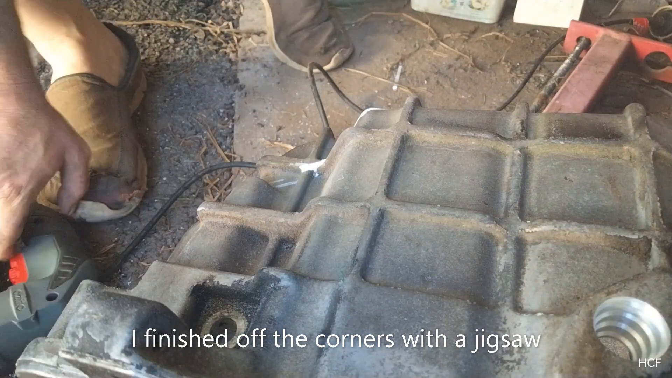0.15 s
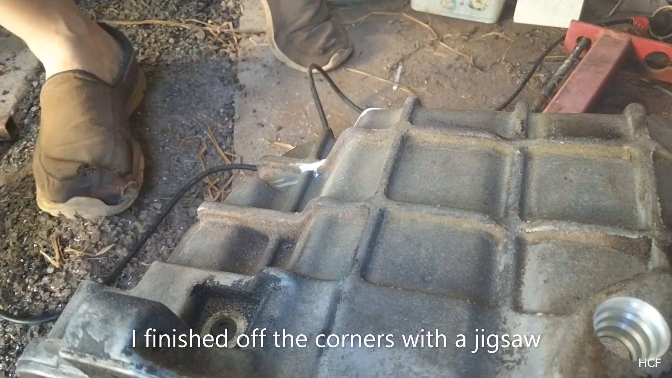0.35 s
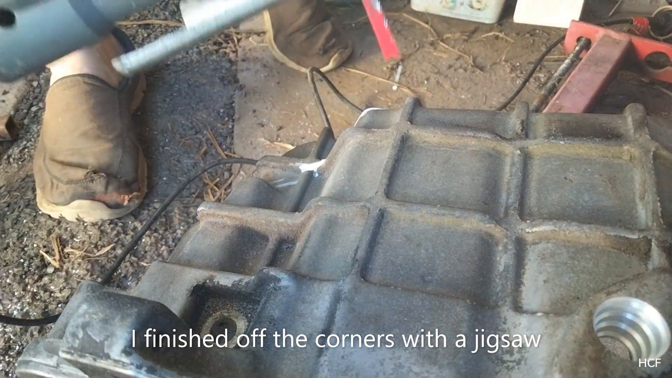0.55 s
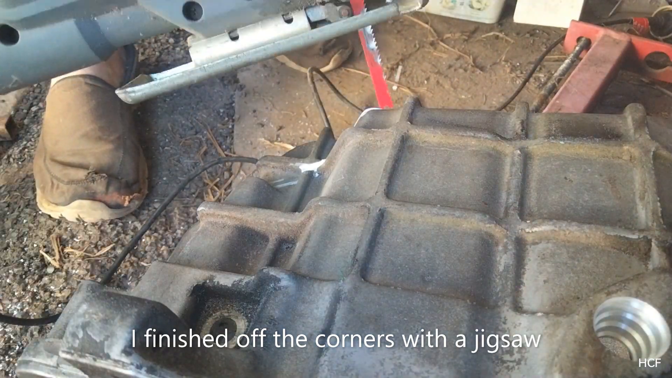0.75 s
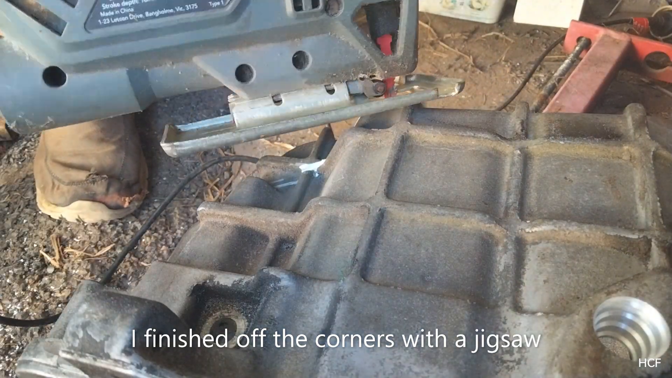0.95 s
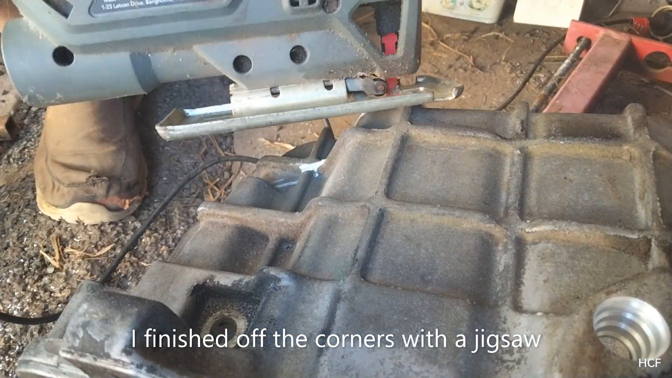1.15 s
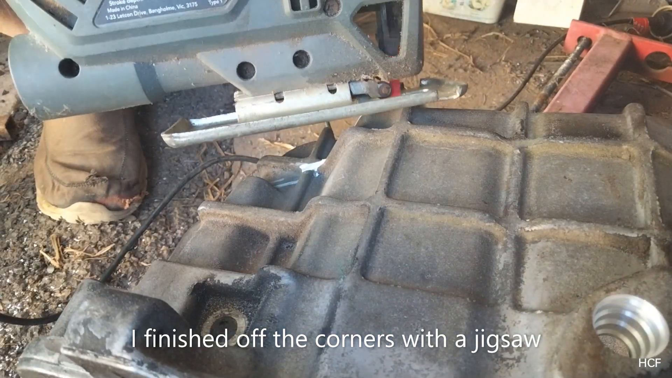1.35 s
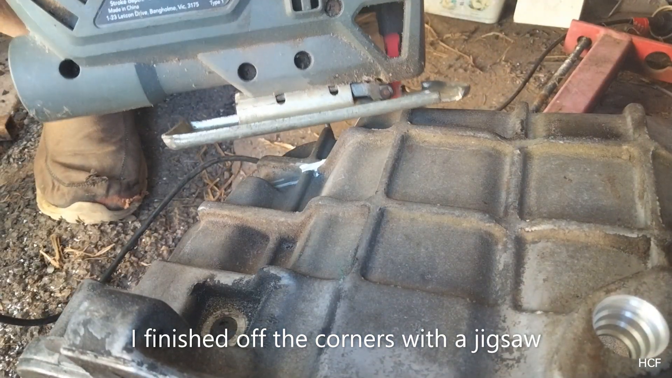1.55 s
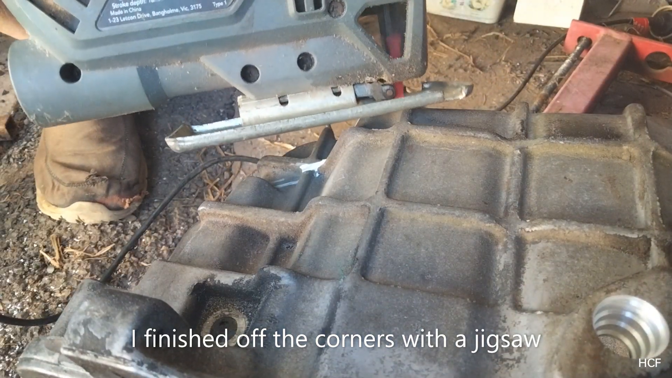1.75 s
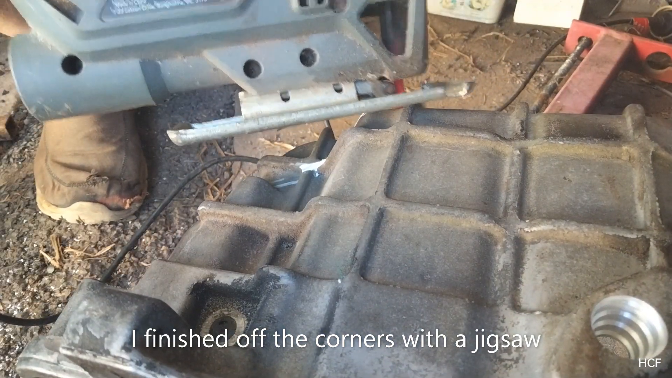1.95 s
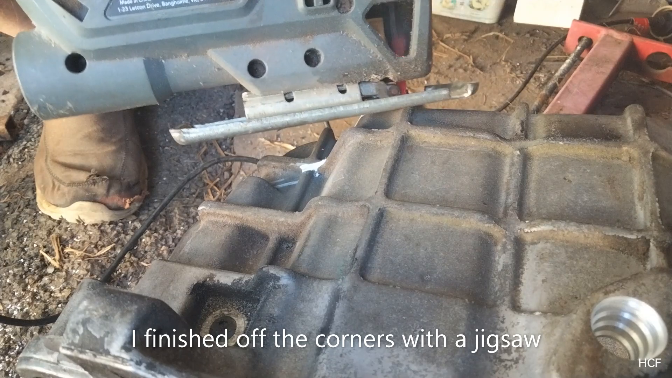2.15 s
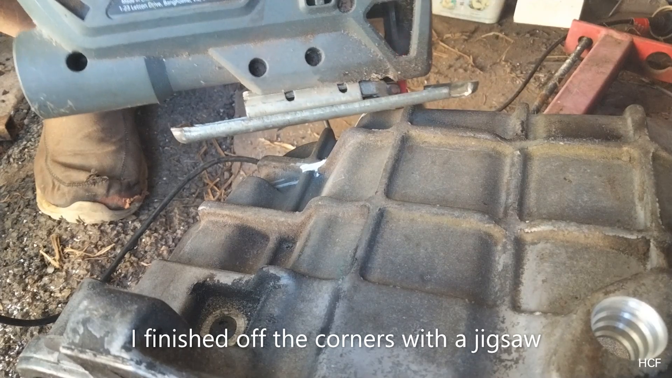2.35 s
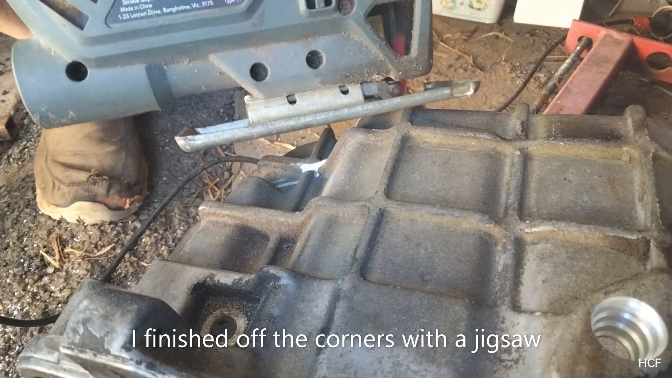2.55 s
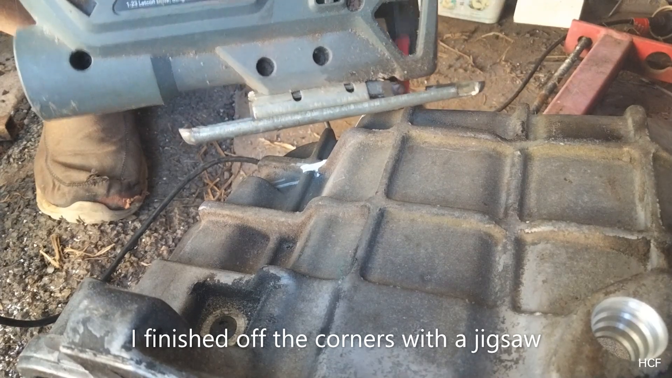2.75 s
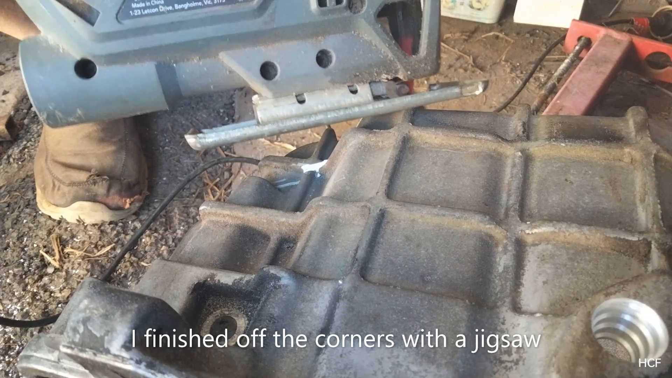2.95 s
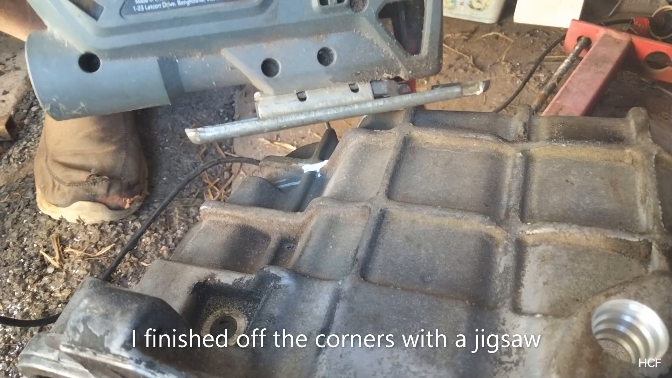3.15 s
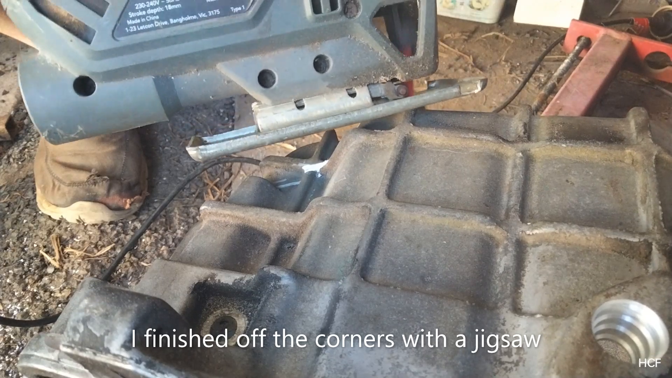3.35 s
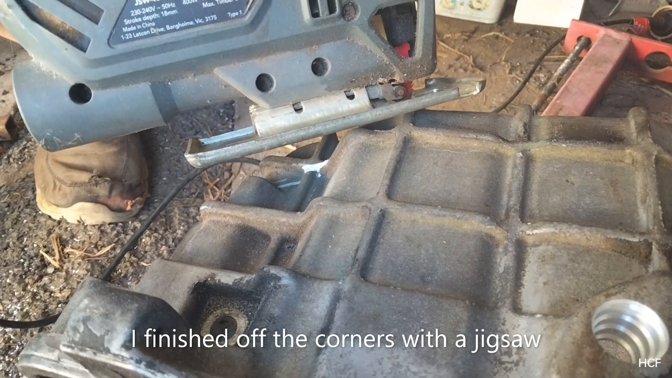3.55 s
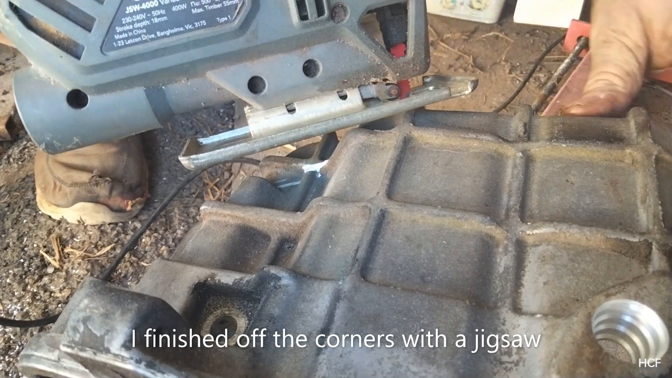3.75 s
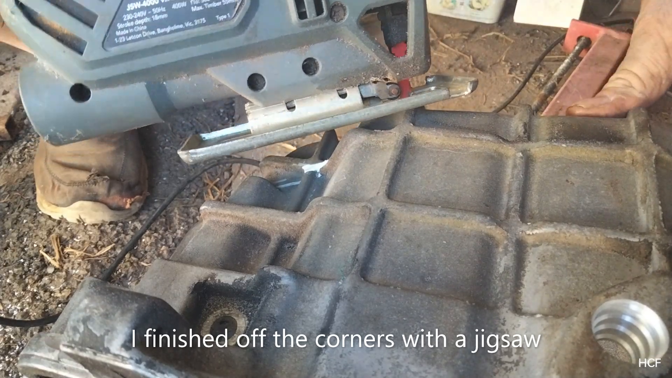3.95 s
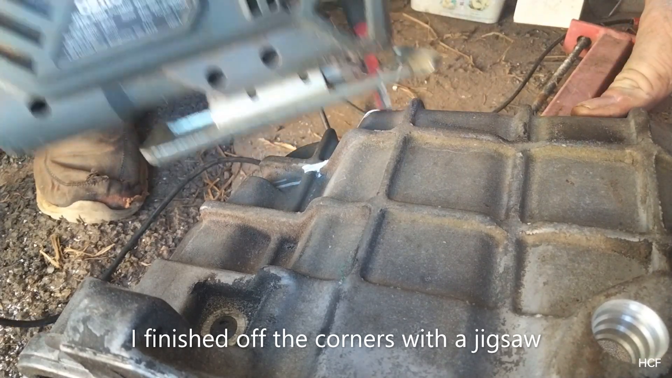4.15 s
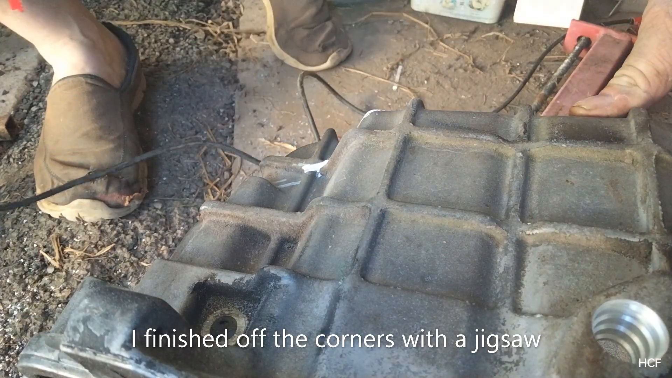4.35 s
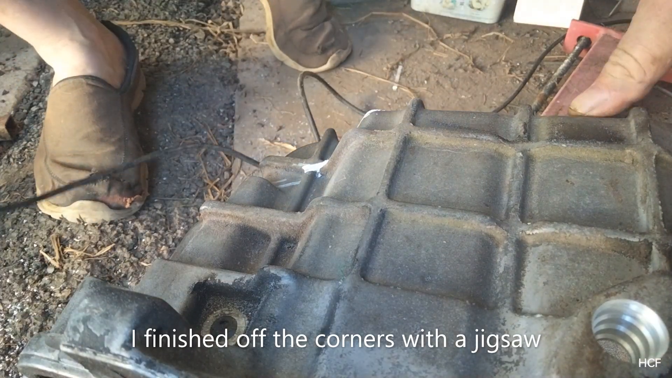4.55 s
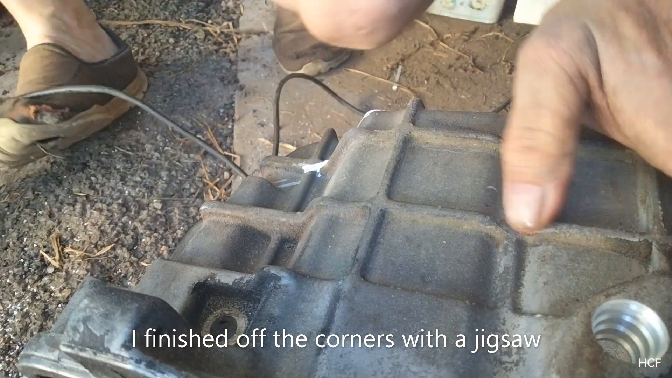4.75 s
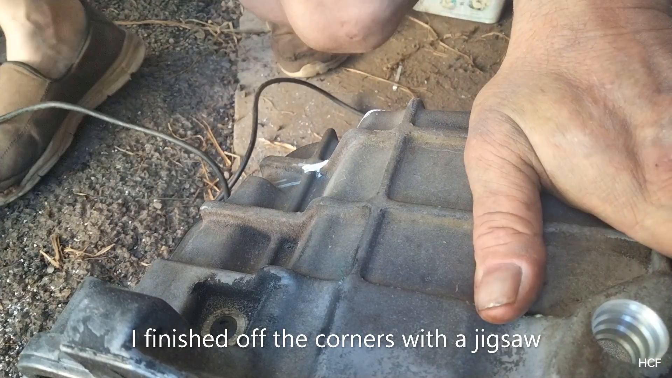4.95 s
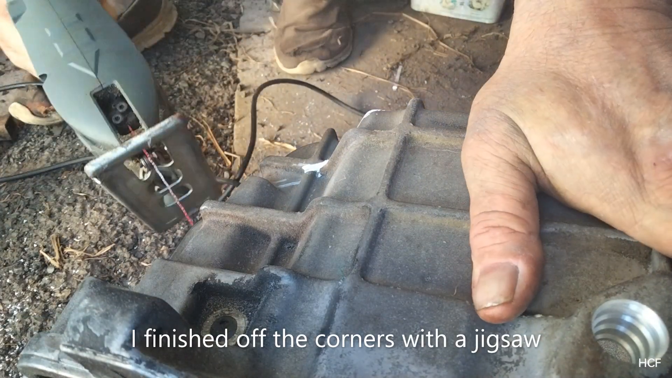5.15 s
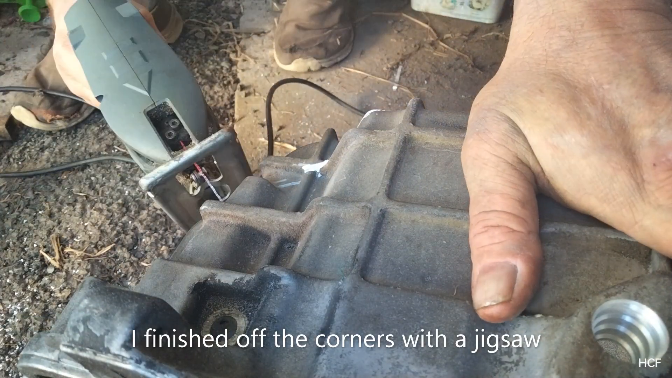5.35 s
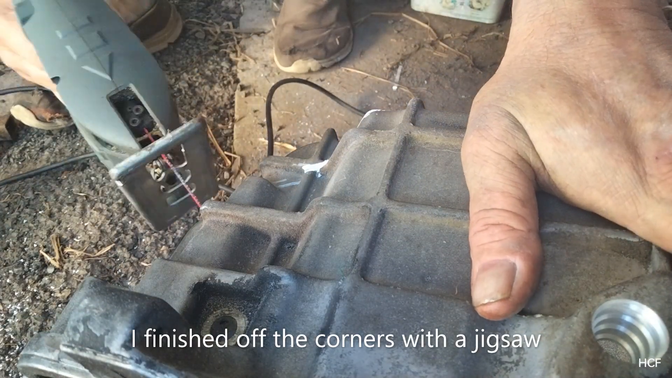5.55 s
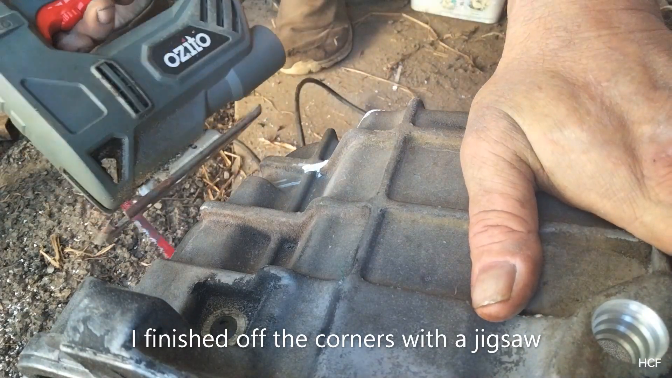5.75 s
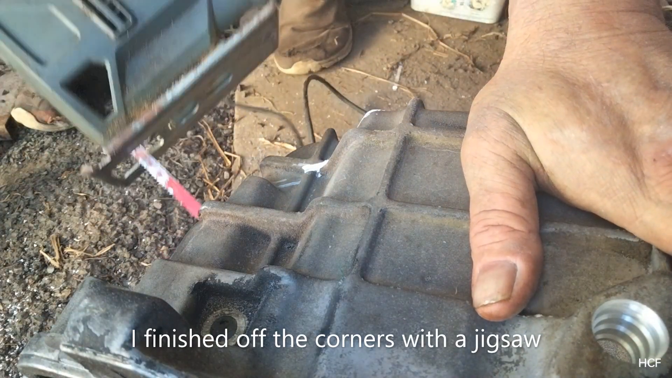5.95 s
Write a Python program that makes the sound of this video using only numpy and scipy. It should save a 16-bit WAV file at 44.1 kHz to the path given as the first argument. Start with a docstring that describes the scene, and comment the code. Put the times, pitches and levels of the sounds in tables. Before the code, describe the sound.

Quiet shuffling on grit and small dry ticks, then a thin blade tapping an edge and a steel shoe clacking onto a casting. One loud jigsaw cut dominates the middle: coarse, rattling, uneven in speed, with motor whine and a late screech. It kicks free and stops; the saw clanks on metal, then sparse clicks and scuffs remain. Close, dry microphone, faint wavering hum.

```python
"""Close two-port microphone over a gritty floor: still air, an uneven distant rumble, a hum that comes and goes.
Shoes, clothes and cable scuff the grit (filtered noise) and small clicks fall; the blade taps along the edge, then
the jigsaw's steel shoe clacks onto a cast aluminium housing (noise bursts ringing in modes of the metal).
From 1.3 to 3.5 s it cuts at a changing speed: rasp, rattle, gear and whine follow one stroke angle, with squeals.
Coasting, it leaves the slot; a clank on the casting near 4.2 s, clicks and scuffs follow."""
import sys
import numpy as np
from scipy import signal
from scipy.fft import rfft, irfft
from scipy.io import wavfile
from scipy.ndimage import uniform_filter1d

SR = 44100
rng = np.random.default_rng(int(sys.argv[2]) if len(sys.argv) > 2 else 0)


def digitize_waveform(pressure):
    """Quantize a signal to 16-bit integers and store it at the path in sys.argv[1].

    Rows of a 2-D input are taken as channels; values are limited to [-1, 1].
    """
    field = np.atleast_2d(pressure).T
    bounded = np.clip(field, -1, 1)
    quanta = np.round(bounded * 32767).astype(np.int16)
    wavfile.write(sys.argv[1], SR, quanta)


N = 268125
T, HZ = np.arange(N) / SR, np.fft.rfftfreq(N, 1 / SR)
OFF_S, OUT_S = 3.29, 3.485  # the trigger is let go, the blade leaves the slot
FAST_HZ = 127  # blade strokes a second at which the cut runs steadily


def amp(db):
    """Decibels to gain."""
    return np.exp(np.asarray(db) * (np.log(10) / 20))


def unit(x):
    """Scales to rms 1."""
    return x / np.sqrt(np.mean(x ** 2) + 1e-20)


def read(points, hz=HZ):
    """Reads a spectrum table along a log-frequency axis."""
    f, value = np.transpose(points)
    return np.interp(np.log(hz + 1), np.log(f + 1), value)


def since(s):
    """Seconds gone by after a moment, zero before it."""
    return np.maximum(T - s, 0)


def swell(start, end, edge=.25):
    """Rises, holds and falls between two moments; each edge takes a share of the length."""
    u = (T - start) / (end - start)
    return np.sin(np.pi / 2 * np.clip(np.minimum(u, 1 - u) / edge, 0, 1)) ** 2


def panned(db):
    """Gains of the two channels for a left-minus-right level."""
    return amp(np.array([[db], [-db]]) / 2)


def wander(hz):
    """Slow random drift of rms 1, with little movement faster than the given rate."""
    real, imag = rng.standard_normal((2, len(HZ) // 4))
    return unit(irfft((real + 1j * imag) / (1 + (HZ[:len(real)] / hz) ** 4), N))


def colour(x, gain):
    """Filters by a gain for every frequency, to rms 1."""
    return unit(irfft(rfft(x) * gain, N))


def humps(modes):
    """Gain of a set of resonances (f/Hz, width/Hz, level/dB), rms 1."""
    return unit(np.sqrt(sum(amp(db) ** 2 / (1 + (2 * (HZ - hz) / width) ** 2) ** 2 for hz, width, db in modes)))


def ports(pair, likeness=1.):
    """Two unrelated signals become what the left and right microphone ports pick up."""
    # what the ports share: (f/Hz, likeness before scaling)
    port_likeness = [(60, 0.78), (130, 1), (290, 0.84), (640, 1), (1410, 0.95), (3100, 0.7), (6820, 0.024),
                     (15000, 0.44)]
    # phase between the ports: (f/Hz, left leads by/rad)
    port_lead = [(0, -3), (1890, 0.33), (3270, 1.72), (4820, 1.5), (5080, 3), (6630, -2), (8180, 6),
                 (8700, 11.5), (9650, 9.5), (12000, -0.5), (12900, 10.5), (15100, -3), (15800, -10.5),
                 (16600, 45)]
    # balance of the ports: (f/Hz, left minus right level/dB)
    port_tilt = [(60, -6.5), (110, -1.5), (200, -0.5), (380, 0), (700, -0.5), (1290, -0.5), (2380, 0.0),
                 (4400, -0.5), (8120, -1.5), (15000, 0)]
    a, b = rfft(pair)
    same = np.clip(read(port_likeness) * likeness, 0, 1)
    side = amp(read(port_tilt) / 2) * np.exp(.5j * read(port_lead))
    left = a * side
    right = (same * a + np.sqrt(1 - same ** 2) * b) / side
    return irfft(np.array([left, right]), N)


def hiss(likeness=0.42):
    """White noise at both ports."""
    return ports(rng.standard_normal((2, N)), likeness)


def tearing(x, patchy_db, rate_hz):
    """Uneven grains or chips: each band of the sound flares and fades by itself."""
    z = signal.stft(x, nperseg=256, noverlap=192)[2]
    field = uniform_filter1d(rng.standard_normal(z.shape[1:]), size=5, axis=0)
    field = uniform_filter1d(field, size=max(1, round(SR / rate_hz / 64)), axis=1)
    return signal.istft(z * amp(patchy_db * unit(field)), nperseg=256, noverlap=192)[1][:, :N]


def background():
    """Still air and an uneven distant rumble are filtered noise; the faint hum is a wavering sine."""
    # colour of the still air: (f/Hz, relative level/dB per Hz)
    air_colour = [(18, -68.5), (30, -24.5), (138, -7), (245, 6.5), (295, -5.5), (526, 0), (1130, -7.5),
                  (1960, -8.5), (3220, -9.5), (4080, -6), (4420, -9.5), (9460, -19), (11700, -24),
                  (13000, -22), (16000, -26)]
    # the hum comes and goes: (start t/s, end t/s, level/dB)
    hum_swells = [(.1, .75, -59.5), (.6, 1.28, -53.5), (3.48, 4.28, -52)]
    air = amp(-50.5) * colour(hiss(0.71), amp(read(air_colour)))
    low_cut = HZ ** 2 / (HZ ** 2 + 150 ** 2)
    rumble = colour(hiss(1.0), humps([(360, 380, 0)]) * low_cut)
    low = amp(-56.0 + 3.1 * wander(6.1)) * rumble
    hum = unit(np.sin(2 * np.pi * np.cumsum(263 + 1.95 * wander(5.3)) / SR))
    presence = sum(amp(db) * swell(start, end) for start, end, db in hum_swells)
    return air + low + presence * amp(1.0 * wander(8.7)) * hum


def scuffs():
    """Shoes, clothes and cable drag softly over grit: grainy noise, part gritty and part dull rubbing."""
    # colour of grit underfoot: (f/Hz, relative level/dB per Hz)
    grit_colour = [(300, -30), (600, -12), (1100, -8), (1900, -3.5), (4400, -8.5), (9000, -10),
                   (12000, -13), (16000, -16.5)]
    # resonances of dull rubbing: (f/Hz, width/Hz, relative level/dB)
    rub_modes = [(600, 140, 0), (992, 350, -10)]
    # single drags: (start t/s, end t/s, level/dB, share of dull rubbing 0-1)
    drags = [(.073, 0.302, -43.5, 0.02), (0.32, .447, -49.5, 0), (0.63, 0.707, -46.5, 0.2),
             (0.938, 1.206, -43.5, .01), (3.626, 4.265, -51, 0.45), (4.555, 4.854, -47.5, 0.14),
             (4.802, 5.068, -42, 0.03), (5.075, 5.143, -42, 0), (5.12, 5.295, -52, 0),
             (5.38, 5.668, -43.5, 0.33), (5.752, 5.94, -45, 0)]
    grains = hiss(0.75) * amp(2.0 * wander(820) + 1.1 * wander(54))
    grains = tearing(grains, patchy_db=3.5, rate_hz=30)
    gritty = colour(grains, amp(read(grit_colour)))
    dull = colour(grains, humps(rub_modes))
    out = np.zeros((2, N))
    for start, end, db, share in drags:
        at = np.arange(round(start * SR), round(end * SR))
        stroke = amp(db) * signal.windows.tukey(len(at), .5)
        out[:, at] += stroke * (np.sqrt(1 - share) * gritty[:, at] + np.sqrt(share) * dull[:, at])
    return out


def clicks(level_db=1.2, ring_width_hz=350, click_t60=0.044, kick_t60=.04, rise_s=0.00081):
    """Tool, grit and the blade kicking in its slot: each click is a dry crack with one short ring."""
    # tool and grit: (t/s, level/dB before level_db, ring f/Hz, ring share 0-1, left minus right level/dB)
    small_clicks = [(.2325, -33, 8290, .05, 1), (0.318, -33.5, 7970, 0, 3), (.3614, -37, 2420, .5, .5),
                    (.402, -29.5, 9800, 0.24, 1), (0.412, -31, 9600, 0.4, 0),
                    (0.425, -27.5, 5770, 0.08, 1.5), (.493, -42, 1840, 0.05, 3), (.6494, -36, 2160, .4, -2),
                    (3.5034, -24, 6260, 0.2, 0), (3.704, -36.5, 11900, 0.64, -4),
                    (3.747, -37, 1780, .24, 0), (3.9188, -21, 4100, 0.72, -1.5), (4.0465, -41, 1700, 0, 0),
                    (4.7443, -20, 5360, .14, 1), (5.0774, -37.5, 3950, .6, 4),
                    (5.1141, -34, 3300, 0.56, 1.5)]
    # the blade kicks in the slot: (t/s, level/dB before level_db, ring f/Hz, ring share 0-1)
    slot_kicks = [(1.272, -21, 6370, 0.1), (2.039, -15, 1860, .7), (2.04, -18.5, 4250, 1),
                  (3.304, -12, 1410, 0.27), (3.468, -18, 1750, 0), (3.478, -12.5, 1640, 0.8)]
    # colour of the dry crack: (f/Hz, relative level/dB per Hz)
    crack_colour = [(290, -48), (500, -1), (974, -6), (2040, -0.5), (2930, 0.5), (3340, 0.5), (8210, 1.5),
                    (12000, -3), (16000, -3.5)]
    crack = colour(hiss(), amp(read(crack_colour)))
    shimmer = np.array([wander(ring_width_hz), wander(ring_width_hz)])
    out, t = np.zeros((2, N)), T[:SR // 6]
    events = [(*row, click_t60) for row in small_clicks] + [(*row, 0, kick_t60) for row in slot_kicks]
    for s, db, hz, share, pan_db, t60 in events:
        at = round(s * SR) + np.arange(len(t))
        ring = unit(shimmer[:, at] * np.sin(2 * np.pi * hz * t))
        envelope = (1 - np.exp(-t / rise_s)) * amp(db + level_db - 60 * t / t60)
        out[:, at] += panned(pan_db) * envelope * (np.sqrt(1 - share) * crack[:, at] + np.sqrt(share) * ring)
    return out


def blows(rows, spectrum, modes, scrape_db, ring_db, likeness):
    """A short scraping contact swells and dies; the struck metal rings on in its modes."""
    force = 0
    for s, db, rise, t60 in rows:
        away = abs(T - s)
        force = force + amp(db) * np.where(T < s, np.exp(-away / rise), amp(-60 * away / t60))
    noise, t = hiss(likeness), T[:SR // 3]
    ring = sum(amp(db - 60 * t / t60) * np.cos(2 * np.pi * hz * t) for hz, db, t60 in modes)
    ring = ring / np.linalg.norm(ring)
    ringing = signal.fftconvolve(noise * force, ring[None], axes=1)[:, :N]
    scrape = force * colour(noise, amp(read(spectrum)))
    return amp(scrape_db) * scrape + amp(ring_db) * ringing


def taps():
    """The blade taps and slides along the edge and rings in its own modes."""
    # contacts: (t/s, relative level/dB, scrape rise/s, scrape t60/s)
    contacts = [(.719, -34.5, 0.001, 0.014), (.729, -35.5, 0.0024, 0.082), (.756, -43.5, .002, 0.017),
                (.852, -44.5, .002, 0.036), (.871, -37, 0.0077, 0.064), (.888, -40.5, .001, .03),
                (.938, -43.5, .001, 0.052), (1.251, -29.5, 0.00029, 0.061)]
    # colour of the scrape: (f/Hz, relative level/dB per Hz)
    scrape_colour = [(470, -43), (800, -17), (1370, -15), (1850, -10), (2600, -7.5), (4860, -4.5),
                     (5240, -5), (8770, -8), (14100, -12), (16000, -22)]
    # modes of the blade: (f/Hz, relative level/dB, t60/s)
    blade_modes = [(1794, 0.5, 0.065), (4880, -0.5, 0.044), (5950, -1, .08), (8700, -2, 0.053),
                   (9400, -2.5, 0.12), (13770, -8, .1)]
    return blows(contacts, scrape_colour, blade_modes, scrape_db=6.0, ring_db=0.5, likeness=0.68)


def clacks():
    """The steel shoe lands on the casting and rings."""
    # contacts: (t/s, relative level/dB, scrape rise/s, scrape t60/s)
    contacts = [(.963, -14, 0.00044, 0.049), (.972, -19.5, 0.0014, 0.058), (4.083, -35.5, 0.00024, 0.028)]
    # colour of the scrape: (f/Hz, relative level/dB per Hz)
    scrape_colour = [(59, -54), (100, -19), (1080, -16.5), (1420, -39), (1830, -19.5), (2470, -20),
                     (2750, -35), (3050, -17.5), (4570, -18.5), (6990, -8.5), (9020, -5), (10200, -18),
                     (14100, -9), (16000, -34)]
    # modes of the shoe: (f/Hz, relative level/dB, t60/s)
    shoe_modes = [(3980, -9, 0.11), (5840, -17, 0.1), (6830, 11, 0.04), (8500, -26, 0.08),
                  (8690, 14, 0.013), (9631, -35, 0.045)]
    return blows(contacts, scrape_colour, shoe_modes, scrape_db=3.5, ring_db=-4.5, likeness=0.55)


def cutting(snag_rough=0.46, coast_hz_per_s=157, coast_rough_per_s=15.0):
    """The state of the cut: stroke rate, share of the lighter cut, extra rattle of snags in dB, roughness."""
    # motor speed with the trigger held: (t/s, stroke rate f/Hz before jitter)
    held_speed = [(1.25, 45), (1.4, 66), (1.5, 81), (1.61, 84), (1.68, 102), (1.85, 137), (1.92, 142),
                  (2.0, 140), (2.08, 126), (2.19, 114.5), (2.39, 108), (2.52, 127), (2.72, 131),
                  (2.82, 130), (2.9, 125.5), (3.0, 131), (3.15, 133.8), (3.28, 132.6)]
    # the teeth snag, rattle harder and lose their rhythm: (start t/s, end t/s, extra rattle level/dB)
    snag_spans = [(1.38, 1.41, 4), (1.996, 2.06, 2), (2.105, 2.17, 3), (2.814, 2.92, 5.5)]
    coasting_s = since(OFF_S) - since(OUT_S)
    speed = np.interp(T, *np.transpose(held_speed)) - coast_hz_per_s * coasting_s
    late = .75 * (1 + np.tanh((T - 2.8) / .13)) / 2  # the cut lightens around 2.8 s
    snag = sum(db * swell(start, end, edge=0.37) for start, end, db in snag_spans)
    # ragged at low speed, steadier at high speed
    rough = np.interp(speed, [96, FAST_HZ], [0.63, 0.36])
    rough = rough + snag_rough * snag / snag.max() + coast_rough_per_s * since(OFF_S)
    return speed, late, snag, np.clip(rough, 0, 1)


def each_stroke(phases, angle):
    """A pattern that repeats on every stroke, from the phases of its harmonics (one row a port)."""
    cycle = irfft(np.exp(1j * phases) * (np.arange(phases.shape[1]) > 0), 8192)
    place = (angle / (2 * np.pi) % 1 * cycle.shape[1]).astype(int)
    return unit(ports(cycle[:, place], likeness=1.09))


def rasping(passing, chips, bite, late, rough, repeat=0.49, ring_share=0.18, low_hz=2100):
    """Teeth drag through metal: part of the noise repeats each stroke and excites saw and casting."""
    # rasp with the teeth deep in the metal, then near the end of the cut: (f/Hz, relative level/dB per Hz)
    rasp_deep = [(240, -48), (400, -25), (655, 6.5), (964, -4), (1070, 7), (1330, -9), (1840, -2.5),
                 (2050, -11), (3690, -8.5), (4880, -7), (5600, -8.5), (6440, -4.5), (7400, -9),
                 (13300, -10.5), (16000, -12.5)]
    rasp_late = [(240, -46), (400, -0.5), (579, -26), (655, 19.5), (852, -7), (1040, 16), (1250, 10),
                 (1680, 0), (2800, -5), (3990, -2), (4440, -6), (5030, -2), (7400, -10), (8370, -2.5),
                 (16000, -9)]
    # narrow resonances of saw and casting, deep and late: (f/Hz, width/Hz, relative level/dB)
    ring_deep = [(1834, 75, -9), (3150, 105, -9.5), (4150, 74, -5), (4930, 120, -0.5), (6230, 58, -1.5),
                 (6660, 92, -3), (7940, 144, -2), (8510, 126, -4.5), (9500, 190, -5.5), (10850, 120, -5.5),
                 (13370, 380, -6)]
    ring_late = [(2480, 240, -3.5), (3970, 260, -1), (6310, 130, -1.5), (7020, 250, -0.5),
                 (7740, 290, -0.5), (8570, 240, 3.5), (13200, 1040, -8.5)]
    alike = repeat * (1 - rough)
    teeth = (np.sqrt(alike) * passing + np.sqrt(1 - alike) * chips) * bite
    teeth = tearing(teeth, patchy_db=1.5, rate_hz=39)

    def through(spectrum, modes):
        """Teeth noise through a broad colour and a set of resonances."""
        broad = unit(amp(read(spectrum)))
        return colour(teeth, np.sqrt((1 - ring_share) * broad ** 2 + ring_share * humps(modes) ** 2))

    mixed = (1 - late) * through(rasp_deep, ring_deep) + late * through(rasp_late, ring_late)
    low_cut = 1 / np.sqrt(1 + (low_hz / HZ.clip(1)) ** 6)
    return colour(mixed, low_cut) * amp(.5 * wander(15))


def knocking(passing, bite, angle, late, rough, jolt_share=0.47):
    """Stroke jolts mix with irregular chatter as the cut gets rougher."""
    # as the cut lightens, the loose parts land together in one smeared jolt a stroke
    jolts = each_stroke(-.09 * np.array([np.arange(34)] * 2) ** 2, angle)
    loose = jolt_share * late
    regular = (np.sqrt(loose) * jolts + np.sqrt(1 - loose) * passing) * amp(1.2 * wander(50))
    chatter = unit(tearing(hiss() * bite, patchy_db=3.0, rate_hz=30))
    knock = np.sqrt(1 - rough) * regular + np.sqrt(rough) * chatter
    return tearing(knock, patchy_db=3.5, rate_hz=16)


def rattling(knock, late):
    """The jolts ring in saw and casting, whose resonances shift in balance late in the cut."""
    # (f/Hz, width/Hz, relative level/dB deep in the cut, relative level/dB late in the cut)
    body = np.array([(622, 122, 4, -11), (769, 150, -1.5, 4), (864, 65, 1, 6), (1066, 110, -3.5, 4.5),
                     (1247, 110, -3.5, -6), (1444, 110, 2.5, 9.5), (1700, 144, -12, 14),
                     (1910, 190, -33, 8), (2370, 180, -1, 1)])
    deep = colour(knock, humps(body[:, :3]))
    light = colour(knock, humps(body[:, [0, 1, 3]]))
    return unit((1 - late) * deep + late * light)


def gearing(angle, speed, late, rough):
    """Gear mesh sings at five cycles a stroke, louder with speed and load."""
    mesh = [np.sin(5 * angle + 0.41 * wander(40)) * amp(3.8 * wander(26)) for _ in range(2)]
    level = -39.5 + 15 * np.log2((speed + 1) / FAST_HZ) - 28 * late - 6 * rough
    return amp(level) * unit(ports(mesh))


def whining(angle, speed, rough, order=39, peak_hz=5000, peak_width_hz=300):
    """The motor whines at 39 cycles a stroke, swelling as it speeds up and as it crosses a resonance."""
    drift = 2 * np.pi * np.cumsum(speed * .016 * rough * wander(150)) / SR
    whine = unit(np.sin(order * (angle + drift)) * (1 + np.array([wander(50), wander(43)])))
    gain_of_speed = uniform_filter1d(np.gradient(speed) * SR, size=2048)
    effort = np.clip(gain_of_speed / 150, 0, 1)  # full at 150 strokes a second gained each second
    resonance = 1 / (1 + (2 * (order * speed - peak_hz) / peak_width_hz) ** 2)
    return amp(-34 + 2.5 * effort + 4.5 * resonance) * whine


def saw(on_s=1.2605):
    """Each stroke drags teeth through the metal and jolts saw and casting; gear and motor sing above it."""
    # the blade binds in the slot and rings: (start t/s, end t/s, level/dB)
    binds = [(1.3, 1.356, -41), (1.858, 1.967, -32), (2.129, 2.185, -27), (2.234, 2.453, -27.5),
             (2.468, 2.752, -35.5)]
    # low shaking: (f/Hz, relative level/dB per Hz)
    shake_colour = [(12, -42), (20, -10.5), (118, -8), (187, -8), (248, -5), (506, -5.5), (559, -7),
                    (600, -12), (780, -13), (1320, -120)]
    speed, late, snag, rough = cutting()
    angle = 2 * np.pi * np.cumsum(speed * (1 + 0.00201 * wander(26.7))) / SR
    # the same teeth pass on every stroke; the bite throbs more as the cut lightens
    passing = each_stroke(2 * np.pi * rng.random((2, 128)), angle)
    chips = hiss()
    bite = 1 + (0.11 + 0.07 * late) * (np.cos(angle) + np.cos(2 * angle))
    rasp = rasping(passing, chips, bite, late, rough)
    knock = knocking(passing, bite, angle, late, rough)
    rattle = rattling(knock, late)
    blade = colour(knock, humps([(1830, 110, 0)]))
    binding = amp(-36.5) * (1 - late) + sum(amp(db) * swell(start, end) for start, end, db in binds)
    shake = colour(chips * bite, amp(read(shake_colour))) * amp(2.3 * wander(13))
    # with the trigger let go, shaking, gear and whine die first, then the rasp; the rattle stays until out
    driven = amp(-41 + snag) * shake + whining(angle, speed, rough) + gearing(angle, speed, late, rough)
    driven = amp(-150 * since(OFF_S)) * driven
    rasp_level = -14.5 + 0.1 * late + 0.23 * snag - 37 * since(OFF_S)
    rattle_level = -36 + 8 * late + snag
    # the teeth bite in from 20 dB down; the freed blade falls silent fast
    contact = (T > on_s) * amp(-20 * np.exp(-since(on_s) / 0.023) - 546 * since(OUT_S))
    return contact * (amp(rasp_level) * rasp + amp(rattle_level) * rattle + binding * blade + driven)


def squeal(start, end, start_hz, end_hz, width_hz, db):
    """A fuzzy whistle that sinks as the free length of blade changes."""
    turn = 2 * np.pi * np.cumsum(np.interp(T, [start, end], [start_hz, end_hz])) / SR
    sides = [wander(width_hz) * np.cos(turn) + wander(width_hz) * np.sin(turn) for _ in range(2)]
    return amp(db) * swell(start, end, edge=0.28) * unit(np.array(sides))


def squeals():
    """The blade squeals near the edge, then screeches in its slot: narrow noise around a sinking pitch."""
    # (start t/s, end t/s, start f/Hz, end f/Hz, width/Hz, level/dB)
    whistles = [(2.57, 2.757, 6440, 6080, 92, -27.5), (2.97, 3.28, 8620, 8270, 600, -20.5)]
    return sum(squeal(*row) for row in whistles)


def clanks():
    """The saw is put down: blows on the casting, which rings in its modes."""
    # contacts: (t/s, relative level/dB, scrape rise/s, scrape t60/s)
    contacts = [(4.141, -38.5, 0.0025, 0.098), (4.192, -38.5, 0.0051, 0.07), (4.207, -35, 0.011, 0.3),
                (4.239, -16.5, 0.0056, 0.062)]
    # colour of the scrape: (f/Hz, relative level/dB per Hz)
    scrape_colour = [(59, -65), (100, -28), (595, -37), (705, -44), (1060, 5), (1280, -21), (1610, -3),
                     (1950, -13), (2420, -8.5), (3620, -16), (4020, -10), (7450, -17.5), (8830, -8.5),
                     (16000, -23)]
    # modes of the casting: (f/Hz, relative level/dB, t60/s)
    casting_modes = [(753, 2, 0.17), (2336, 4.5, 0.04), (4970, -25, 0.26), (6280, -4, 0.11),
                     (7257, -18, 0.081), (7994, -4, 0.056), (8450, -19, 0.098), (9200, -15, 0.12),
                     (10310, -17, 0.15), (11000, -27, 0.07), (11600, -28, 0.12)]
    return blows(contacts, scrape_colour, casting_modes, scrape_db=5.0, ring_db=0.5, likeness=0.75)


def scene():
    """The background, the handling around the cut and the cut itself, each at its left-right balance."""
    around = background() + panned(db=1.0) * scuffs() + clicks()
    knocks = panned(db=-0.3) * (taps() + clacks() + clanks())
    cut = panned(db=-0.5) * (saw() + squeals())
    return around + knocks + cut


def record(dry):
    """The recorder's band limit: a steep low-pass at 16050 Hz."""
    low_pass = signal.firwin(511, 16050, window=("kaiser", 9), fs=SR)
    return signal.oaconvolve(dry, low_pass[None], "same")


dry = scene()
out = record(dry)
digitize_waveform(out)
```